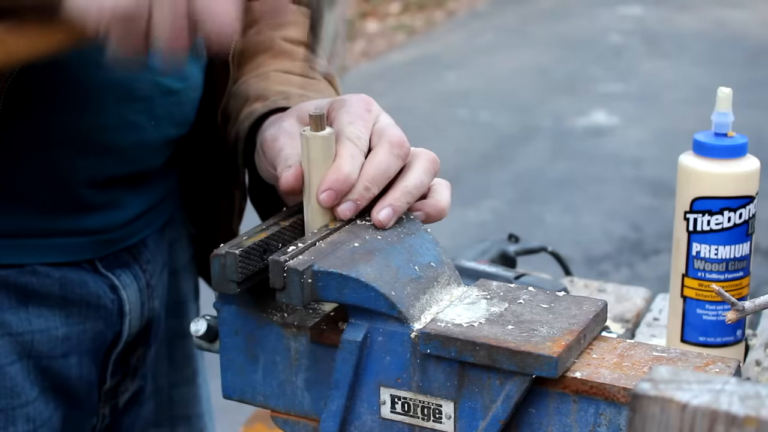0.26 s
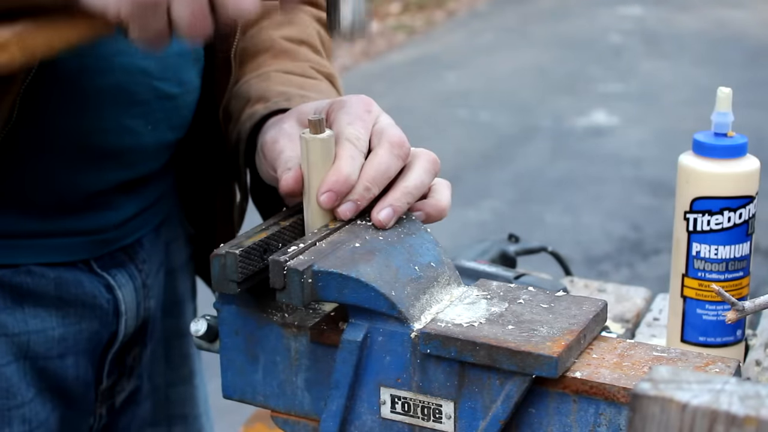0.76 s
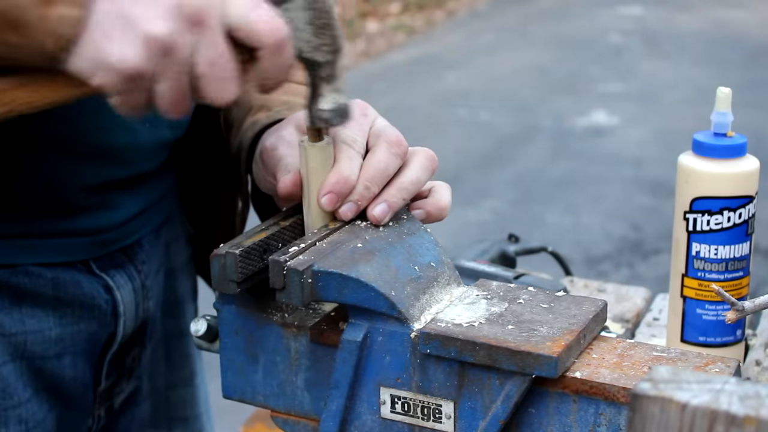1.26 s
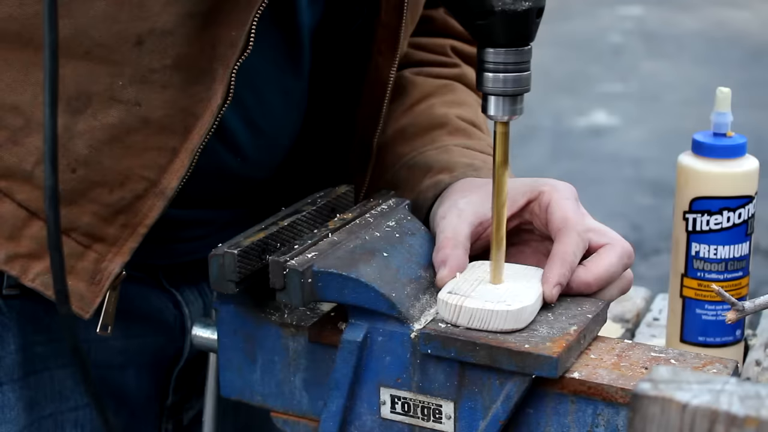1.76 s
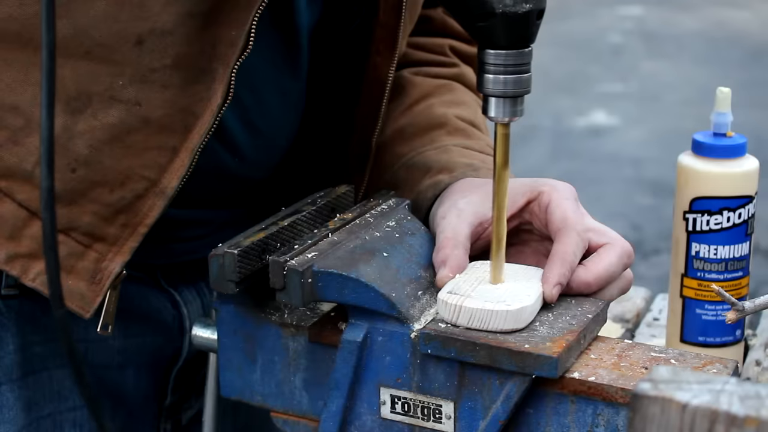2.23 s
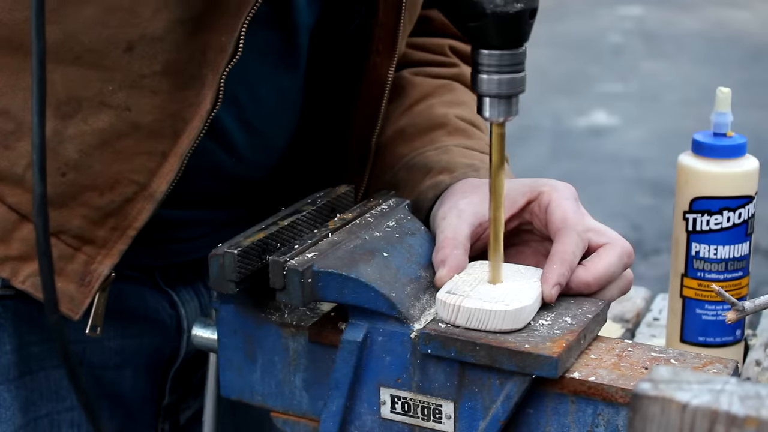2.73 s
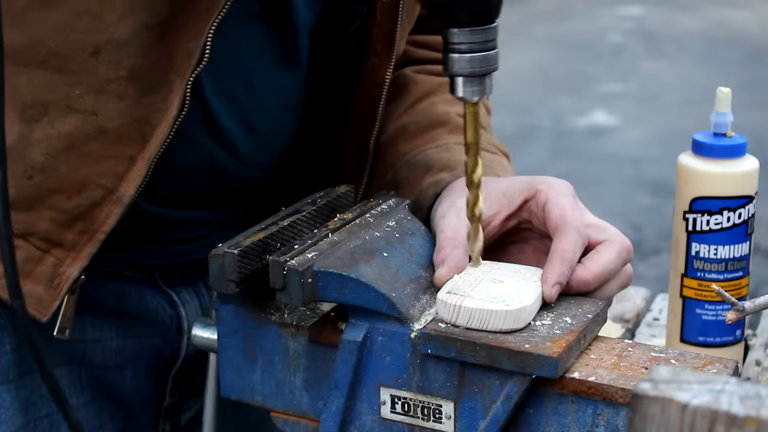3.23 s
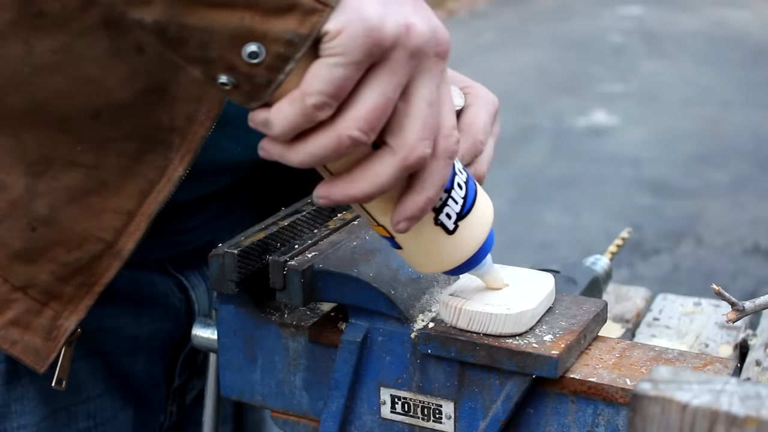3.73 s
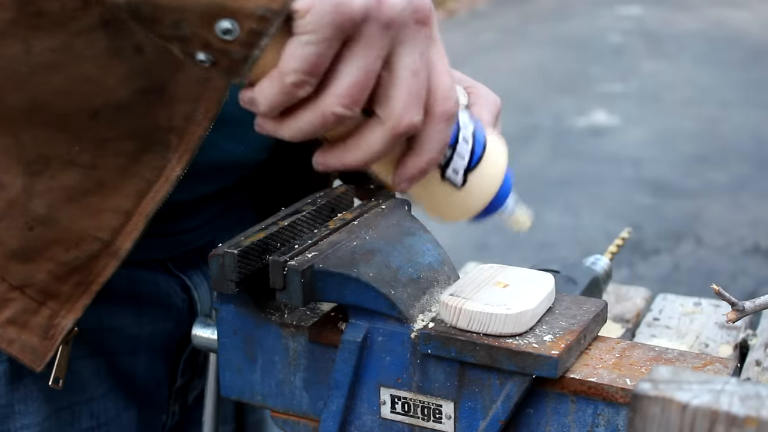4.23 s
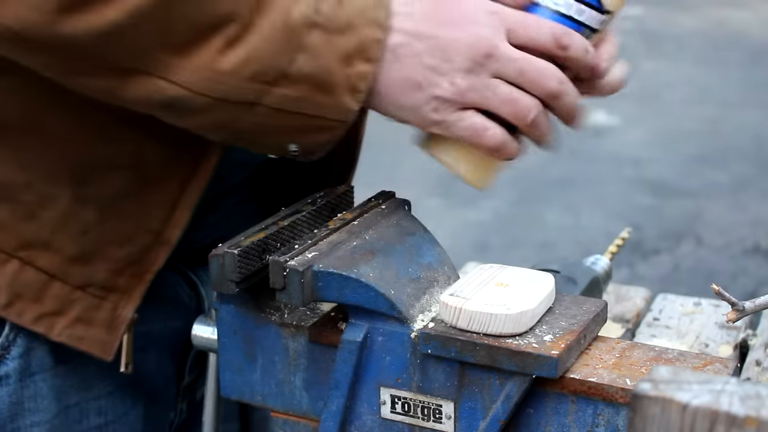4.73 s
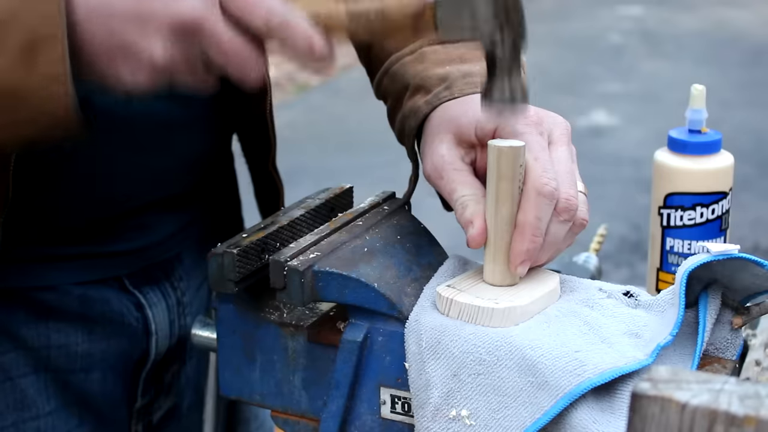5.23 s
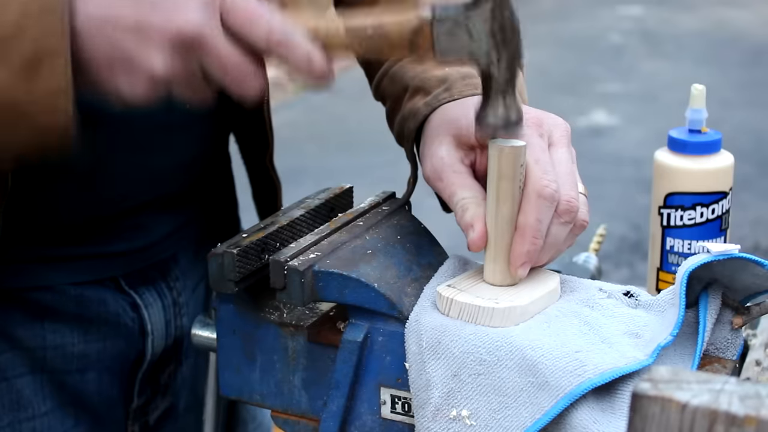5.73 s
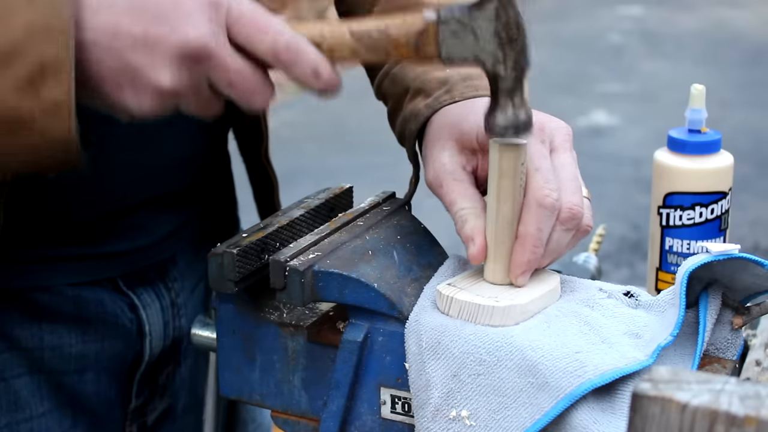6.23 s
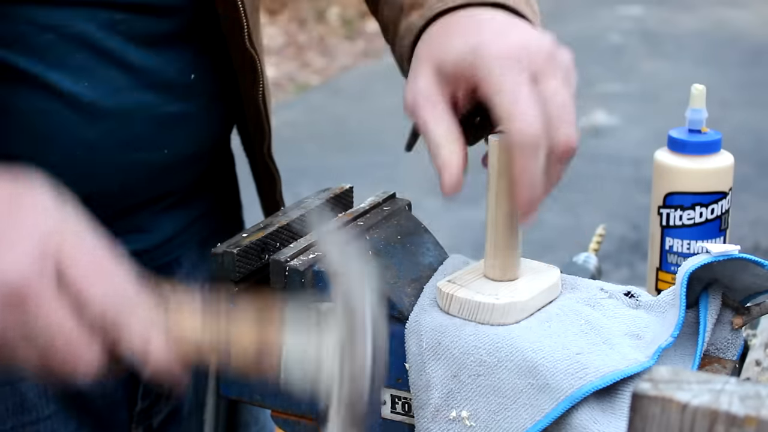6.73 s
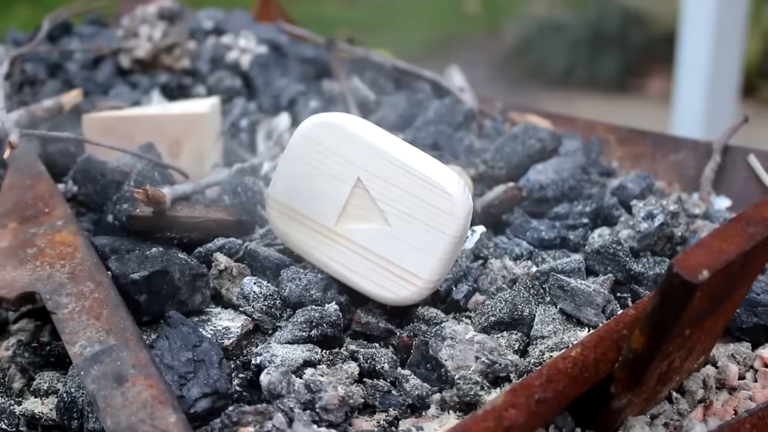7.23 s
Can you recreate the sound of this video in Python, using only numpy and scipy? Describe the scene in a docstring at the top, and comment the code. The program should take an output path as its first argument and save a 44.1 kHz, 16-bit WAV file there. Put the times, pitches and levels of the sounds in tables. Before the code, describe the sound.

A hammer strikes a wooden dowel in a steel vise six times, sharp and bright. An electric drill buzzes up, bores briefly and coasts to a stop with a small squeak. A sleeve rustles, then five deeper blows drive the dowel into a block, rattling the workbench. Finally a spray can hisses. Faint outdoor rumble and air lie underneath, and the blows overload the close mono microphone.

```python
"""Sharp hammer blows on a dowel in a steel vise, outdoors; loose things jump on the bench, a bird calls.
A drill, pulsed by the mains, spins up, bores and coasts to a stop; the bit squeaks out of the hole.
A sleeve rustles during gluing, then deeper blows drive the dowel into a block and ring the bench.
Last, a spray can hisses through its nozzle. Under it all: rumble, air, gusts and a passing drone.
The blows overload a close mono microphone, whose gain dips briefly each time."""
import sys
import numpy as np
from scipy import signal
from scipy.fft import rfft, irfft, next_fast_len
from scipy.io import wavfile
from scipy.ndimage import uniform_filter1d, map_coordinates

SR = 44100
rng = np.random.default_rng(int(sys.argv[2]) if len(sys.argv) > 2 else 0)


def output_pcm(signal):
    """Save a mono or channel-first signal as 16-bit PCM at the path in sys.argv[1].

    Samples are clipped to [-1, 1] before scaling.
    """
    pcm = np.clip(np.atleast_2d(signal).T, -1, 1) * 32767
    wavfile.write(sys.argv[1], SR, np.round(pcm).astype(np.int16))


N = 329427
T = np.arange(N) / SR
AGE_S = T[:SR]  # time since a contact

# blows in the vise: start_s, force_db, head_low_db, head_high_db
VISE_BLOWS = [(0.025, -0.5, 5, -3), (0.3483, -0.5, 1, 0.5), (0.659, -2, -4.5, -4.5), (0.9865, 0, 2, 1),
              (1.2857, -4, -7, 4.5), (1.5975, -3, -6.5, 0.5)]
# blows in the block: start_s, force_db, head_low_db, head_high_db, wood_db
BLOCK_BLOWS = [(5.2208, 0, -9, -5, -5), (5.4768, 1.5, -4, -6, -0.5), (5.728, -1.5, -4, -12.5, 2.5),
               (5.9857, 0.5, -5.5, 3, -4), (6.2275, -2, -10, -14, 2)]
# small contacts: start_s, level_db
TAPS = [(0.311, -25), (0.621, -24), (0.9419, -28), (1.2676, -22), (1.275, -25), (1.5766, -19), (4.455, -35),
        (4.702, -40.5), (6.2812, -19.5)]
KNOCKS = [(1.323, -23.5), (1.635, -21), (4.701, -31.5), (5.541, -18), (5.761, -15), (5.814, -18),
          (6.068, -23.5), (6.281, -20), (6.3153, -18), (6.9145, -25)]
# struck modes: pitch_hz, level_db, t60_s
VISE_MODES = [(124.4, -31.5, 0.91), (1123, -18, 0.094), (1370, -5, 0.023), (1752, -4, 0.045),
              (2210, -28.5, 0.14), (2400, -12, 0.097), (2593, -6.5, 0.041), (2905, 3, 0.014),
              (3256, -2, 0.031), (4360, -8, .025), (5150, -9, 0.017), (8040, -28.5, 0.1),
              (12400, -28, 0.049)]
HEAD_MODES = [(1593, -38.5, 0.37), (5638, -44, 0.89)]
DOWEL_MODES = [(1873, -15, 0.022), (2440, -11.5, 0.039), (3027, -1, 0.022), (4100, -5, 0.0096),
               (4930, -17.5, .015)]
BLOCK_MODES = [(140.2, -12.5, 0.2), (265.3, -19, 0.25), (367.7, -10, 0.17), (460, -4.5, 0.05),
               (600, -8, 0.19), (772, -25.5, 0.116), (864, -11.5, 0.059), (1065, -6, .14),
               (1330, -16.5, 0.18), (1506, -5, 0.056), (1790, -6, 0.056), (2320, -17.5, 0.17),
               (2910, -14, 0.089), (3380, -21.5, 0.18), (3600, -25, 0.12)]  # block and bench
# contact and clatter spectra: freq_hz, density_db
VISE_CRACK = [(60, -20.5), (300, -11.5), (1000, -19), (1800, 6), (3100, 5.5), (5000, -8.5), (9000, -10.5),
              (16000, -35.5)]
VISE_CLATTER = [(40, -21), (130, -1.5), (400, -2), (900, -6), (2500, -9), (4500, -5.5), (9000, -17),
                (16000, -26.5)]
KNOCK_CLATTER = [(60, -16.5), (250, 0.5), (600, 4.5), (1300, 1), (2000, -1), (3200, -16.5), (5000, -32.5),
                 (16000, -55.5)]
BLOCK_CRACK = [(50, -27), (150, -7.5), (600, -11), (1400, -1), (2600, -3), (5000, -17.5), (9000, -24.5),
               (16000, -33)]
BLOCK_CLATTER = [(40, -69), (140, -3), (500, -1), (1300, -2), (2500, -3), (4000, -7), (6000, -19),
                 (16000, -50)]
# clatter decay by band: freq_hz, t60_s
VISE_DECAY = [(130, 0.84), (450, 0.56), (1000, 0.15), (2500, 0.38), (6000, 0.056), (14000, .08)]
KNOCK_DECAY = [(200, 0.16), (600, 0.063), (1500, 0.027), (8000, 0.025)]
BLOCK_DECAY = [(130, 0.41), (500, 0.34), (1300, 0.21), (3500, 0.13), (10000, 0.091)]
# noise spectra: freq_hz, density_db
RUMBLE = [(25, -17), (70, -4.5), (125, 1), (185, -2.5), (330, -6), (510, -12.5), (800, -15), (1500, -34),
          (3000, -75)]
AIR = [(200, -4), (700, 0.5), (1300, 1.5), (2300, -1.5), (3300, 2), (4500, -9.5), (7000, -15.5),
       (15000, -27)]
MIC_HISS = [(1000, -15), (4000, -2.5), (9000, 1), (15500, 0)]
SLEEVE_NOISE = [(240, -17), (400, -0.5), (928, -1.5), (1610, 1), (1990, -2), (3360, 1.5), (4290, -10),
                (15500, -21.5)]
CUFF_NOISE = [(2000, -18.5), (5500, -5), (10000, -1), (15500, -3.5)]
GEAR_NOISE = [(40, -25), (150, -23), (330, -15.5), (800, -12.5), (1400, -5.5), (1850, 0), (2250, -4.5),
              (3300, 1), (4400, -8.5), (5800, -10.5), (7800, -8), (9500, -12.5), (12500, -17), (15500, -28)]
WIND_NOISE = [(35, 1.0), (75, -1.0), (160, -8), (600, -60)]
DRONE_NOISE = [(60, -25), (120, -3), (190, 0), (300, -9), (700, -31), (2000, -70)]
JET_NOISE = [(100, -17), (700, -11), (1400, -9), (2200, -2), (3100, -2.5), (3550, 1.5), (4000, -4.5),
             (5600, -4.5), (6150, 0.5), (6600, -3.5), (7300, 0.5), (9300, 0), (13000, 1.5), (15500, 0)]
# background of each job: start_s, rumble_db, air_db, hiss_db
BACKGROUNDS = [(0, -51, -50, -65.5), (1.738, -61, -56.5, -70.5), (3.61, -52, -61, -65),
               (5.141, -57, -50.5, -67), (6.71, -54.5, -56.5, -66)]
# swells: start_s, length_s, level_db
SLEEVE_STROKES = [(4.3, 0.42, -53), (4.64, 0.24, -51.5), (4.81, 0.33, -44.5)]
CUFF_STROKES = [(4.3, 0.4, -65.5), (4.68, 0.054, -52.5), (4.785, 0.06, -51.5)]
GUSTS = [(2.6, 0.67, -58.5), (3.4, 1.0, -53.5)]
DRONE_SWELLS = [(3.9, 1.4, -49.5)]
# glides: start_s, length_s, first_hz, last_hz, level_db
BIRD_CALLS = [(1.32, 0.15, 7550, 7200, -47.5)]
BIT_SQUEAKS = [(3.463, 0.025, 4560, 4370, -42), (3.49, 0.13, 3320, 3340, -58),
               (3.53, 0.083, 4340, 4300, -65)]
# noise-driven resonances: pitch_hz, width_hz, level_db
HOUSING_MODES = [(1927, 65, -12.5), (3073, 160, -10.5), (6780, 200, -7), (10900, 320, -13),
                 (14200, 400, -21)]
NOZZLE_MODES = [(2694, 165, -10.5), (8400, 240, -12.5)]
# drill housing responses: freq_hz, gain_db
STANDSTILL_TILT = [(2000, 11.0), (3100, 14.5), (6800, -10.5), (14000, -12)]
BRUSH_RESPONSE = [(1100, -17), (1950, 6.0), (2400, -7), (3000, 1), (4000, -12), (6000, -17)]
# hollow notes of the gripped can: pitch_hz, level_db
CAN_NOTES = [(85, -14), (281, -6.5)]

TRIGGER_ON_S, TRIGGER_OFF_S = 1.738, 2.582
MAINS_HZ, FIRST_PULSE_S = 60.05, 1.7432
START_RPS, TOP_RPS, STALL_RPS = 205, 254, 39.4
FAN_BLADES, ARMATURE_SLOTS, COMMUTATOR_BARS, GEAR_RATIO = 8, 12, 24, 13


def amp(db):
    """Decibels to gain."""
    return 10 ** (np.asarray(db) / 20)


def unit(x):
    """Scale to rms 1."""
    return x / np.sqrt(np.mean(x ** 2) + 1e-20)


def along(points, hz):
    """Read (freq_hz, value) points on a log axis."""
    freqs_hz, values = np.transpose(points)
    return np.interp(np.log(hz + 1), np.log(freqs_hz + 1), values)


def wobble(rate_hz):
    """Smooth random curve."""
    return map_coordinates(rng.standard_normal(int(N * rate_hz / SR) + 4), [T * rate_hz])


def filtered(x, response):
    """Apply a frequency response."""
    size = next_fast_len(len(x) + 8192)
    return irfft(rfft(x, size) * response(np.fft.rfftfreq(size, 1 / SR)), size)[:len(x)]


def noise(spectrum, samples=N):
    """Coloured noise, rms 1."""
    return unit(filtered(rng.standard_normal(samples), lambda hz: amp(along(spectrum, hz))))


def fuzzy_tone(hz, width_hz):
    """Narrow noise around a steady or moving pitch, rms 1."""
    phase = 2 * np.pi * np.cumsum(hz * np.ones(N)) / SR
    a, b = (filtered(rng.standard_normal(N), lambda f: 1 / (1 + (f / width_hz) ** 2)) for _ in range(2))
    return unit(a * np.cos(phase) + b * np.sin(phase))


def fade(t60_s):
    """Decay by 60 dB in t60_s."""
    return np.exp(-np.log(1000) * AGE_S / t60_s)


def ramp(start_s, length_s):
    """Linear rise, 0 to 1."""
    return np.clip((T - start_s) / length_s, 0, 1)


def held(start_s, length_s, attack_s, release_s):
    """Attack, hold, release."""
    return ramp(start_s, attack_s) * (1 - ramp(start_s + length_s - release_s, release_s))


def settling(start_s, tau_s):
    """1 until start_s, then exponential decay."""
    return np.exp(-np.maximum(T - start_s, 0) / tau_s)


def swells(rows):
    """One arch of gain per row."""
    return sum(amp(db) * np.sin(np.pi * ramp(start_s, length_s)) for start_s, length_s, db in rows)


def glides(rows, width_hz):
    """Thin sliding tones that swell and ebb."""
    out = np.zeros(N)
    for start_s, length_s, first_hz, last_hz, db in rows:
        pitch_hz = first_hz + (last_hz - first_hz) * ramp(start_s, length_s)
        out += swells([(start_s, length_s, db)]) * fuzzy_tone(pitch_hz, width_hz)
    return out


def ring(modes, scatter_db, detune):
    """Struck modes; each blow lands a little differently."""
    out = np.zeros(SR)
    for hz, db, t60_s in modes:
        gain = amp(db + scatter_db * rng.normal()) * rng.choice([-1, 1])
        pitch_hz = hz * (1 + detune * rng.normal())
        out += gain * fade(t60_s) * np.sin(2 * np.pi * pitch_hz * AGE_S)
    return out


def clatter(spectrum, decays):
    """Dense noisy ring; each band dies at its own rate."""
    hz, age_s, bands = signal.stft(noise(spectrum, SR), SR, nperseg=256)
    decay = np.exp(-np.log(1000) * age_s / along(decays, hz)[:, None])
    return signal.istft(bands * decay, SR, nperseg=256)[1][:SR]


def crack(spectrum, t60_s):
    """Brief burst of a hard contact."""
    envelope = fade(t60_s)
    burst = noise(spectrum, SR) * envelope
    return 0.5 * burst / np.sqrt(np.sum(burst ** 2) / np.sum(envelope ** 2))


def add(track, start_s, sound):
    """Mix a sound in at start_s."""
    part = track[round(start_s * SR):][:len(sound)]
    part += sound[:len(part)]


def background():
    """Distant rumble, soft air and microphone hiss; levels step from job to job."""
    starts_s, rumble_db, air_db, hiss_db = np.transpose(BACKGROUNDS)
    job = np.searchsorted(starts_s[1:], T)
    rumble = amp(rumble_db[job] + 1.3 * wobble(12)) * noise(RUMBLE)
    air = amp(air_db[job] + 1.6 * wobble(7.1)) * noise(AIR)
    return rumble + air + amp(hiss_db[job]) * noise(MIC_HISS)


def vise_hammering():
    """Hard, bright blows: the clamped dowel rings briefly, the bench rumbles on until the scene changes to the
    drill."""
    out = np.zeros(N)
    for start_s, force_db, *_ in VISE_BLOWS:
        contact = amp(16) * crack(VISE_CRACK, t60_s=0.0033)
        dowel = amp(-10) * ring(VISE_MODES, scatter_db=4.5, detune=0.014)
        bench = amp(-25) * clatter(VISE_CLATTER, VISE_DECAY)
        add(out, start_s, amp(force_db) * (contact + dowel + bench))
    return (out + hammer_head(VISE_BLOWS)) * (T < TRIGGER_ON_S)


def hammer_head(blows, swing_s=0.25, swing_db=8):
    """Steel rings until the next contact, swelling as the swing turns it towards the microphone."""
    out = np.zeros(N)
    swing = amp(swing_db * np.sin(np.pi * np.minimum(AGE_S / swing_s, 1)))
    for start_s, _, low_db, high_db, *_ in blows:
        out *= T < start_s
        modes = [(hz, db + struck_db, t60_s)
                 for (hz, db, t60_s), struck_db in zip(HEAD_MODES, (low_db, high_db))]
        add(out, start_s, swing * ring(modes, scatter_db=1, detune=0))
    return out


def clothing(lead_s=0.2, downswing_s=0.14):
    """Canvas sleeve and cuff rustle on each downswing and during gluing."""
    swings = swells([(blow_s - lead_s, downswing_s, 0) for blow_s, *_ in VISE_BLOWS + BLOCK_BLOWS])
    sleeve_gain = (swells(SLEEVE_STROKES) + amp(-52.5) * swings) * amp(1.3 * wobble(250))
    cuff_gain = swells(CUFF_STROKES) + amp(-64.5) * swings
    return sleeve_gain * noise(SLEEVE_NOISE) + cuff_gain * noise(CUFF_NOISE)


def taps():
    """Light, dry contacts of the dowel and handled things."""
    out = np.zeros(N)
    for start_s, db in TAPS:
        wood = amp(1.5) * ring(DOWEL_MODES, scatter_db=3.5, detune=0.026)
        contact = amp(-2) * crack(VISE_CRACK, t60_s=0.018)
        add(out, start_s, amp(db) * (wood + contact))
    return out


def bird():
    """One thin, falling call."""
    return glides(BIRD_CALLS, width_hz=170)


def knocks():
    """Loose things jump on the bench and wake its modes; the last row is a click of the spray can."""
    out = np.zeros(N)
    for start_s, db in KNOCKS:
        rattle = amp(-3) * clatter(KNOCK_CLATTER, KNOCK_DECAY)
        bench = amp(-11) * ring(BLOCK_MODES, scatter_db=4, detune=0.0031)
        add(out, start_s, amp(db) * (rattle + bench))
    return out


def motor_rps(spin_up_s=0.315, drag_s=2.0, friction_rps_per_s=205):
    """Spin-up under power, then coasting against air drag and dry friction."""
    powered_s = np.clip(T, TRIGGER_ON_S, TRIGGER_OFF_S) - TRIGGER_ON_S
    powered_rps = TOP_RPS - (TOP_RPS - START_RPS) * np.exp(-powered_s / spin_up_s)
    drag = settling(TRIGGER_OFF_S, drag_s)
    speed_rps = powered_rps * drag - friction_rps_per_s * drag_s * (1 - drag)
    return np.maximum(speed_rps, 0) * (T > TRIGGER_ON_S)


def armature(angle_rad):
    """Sings on one current pulse per mains cycle; inrush makes the first ones stronger and wider."""
    off_pulse_s = (((T - FIRST_PULSE_S) * MAINS_HZ + 0.5) % 1 - 0.5) / MAINS_HZ
    inrush = settling(TRIGGER_ON_S, tau_s=0.08)
    half_width_s = 0.0015 + 0.0011 * inrush
    pulses = np.exp(-(off_pulse_s / half_width_s) ** 2)
    current = amp(-15 + 2 * inrush) * (T > TRIGGER_ON_S) * (T < TRIGGER_OFF_S)
    return current * pulses * amp(0.51 * wobble(59.9)) * np.sin(ARMATURE_SLOTS * angle_rad)


def gears(angle_rad, pace):
    """Uneven grinding; slowing, slack gears chatter once a turn and favour the low housing modes."""
    chatter_db = 2.9 * (1 - pace) * np.sin(angle_rad)
    uneven = unit(amp(2.2 * wobble(450) + 0.41 * pace * wobble(60) + chatter_db))
    housing = sum(amp(db + 0.5 + (1 - pace) * along(STANDSTILL_TILT, hz)) * fuzzy_tone(hz, width_hz)
                  for hz, width_hz, db in HOUSING_MODES)
    return uneven * (amp(2.5) * noise(GEAR_NOISE) + housing)


def fan(angle_rad, pace):
    """Blade tone, growing with speed cubed."""
    gain = amp(-3.5 + 1.7 * wobble(30.16)) * pace ** 3
    return gain * np.sin(FAN_BLADES * angle_rad + 0.21 * wobble(24.9))


def brushes(speed_rps):
    """Commutator whine, gliding through the housing's resonances."""
    pitch_hz = COMMUTATOR_BARS * speed_rps
    return amp(along(BRUSH_RESPONSE, pitch_hz)) * fuzzy_tone(pitch_hz, width_hz=130)


def drill(db_per_decade=14):
    """Armature buzz plus running noise, which swells with speed, the bit's bite and each chuck turn."""
    speed_rps = motor_rps()
    pace = speed_rps / speed_rps.max()
    angle_rad = 2 * np.pi * np.cumsum(speed_rps) / SR
    speed_db = db_per_decade * np.log10(speed_rps / TOP_RPS + 1e-9)
    bite_db = 4.5 * held(start_s=1.824, length_s=0.913, attack_s=0.22, release_s=0.14)
    chuck_db = 1.6 * np.sin(angle_rad / GEAR_RATIO) * pace
    stall_fade = 1 - np.exp(-(speed_rps / STALL_RPS) ** 2)
    gain = amp(-34.5 + speed_db + bite_db + chuck_db) * stall_fade
    running = gears(angle_rad, pace) + fan(angle_rad, pace) + brushes(speed_rps)
    return armature(angle_rad) + gain * running


def breeze():
    """Gusts buffet the microphone."""
    return swells(GUSTS) * amp(2.7 * wobble(8.6)) * noise(WIND_NOISE)


def bit_squeaks():
    """The bit squeaks on its way out of the hole."""
    return glides(BIT_SQUEAKS, width_hz=75)


def drone():
    """A far, low drone swells and passes."""
    return swells(DRONE_SWELLS) * noise(DRONE_NOISE)


def block_hammering():
    """Deeper blows pass through the block into the bench."""
    out = np.zeros(N)
    for start_s, force_db, *_, wood_db in BLOCK_BLOWS:
        contact = amp(11) * crack(BLOCK_CRACK, t60_s=0.0049)
        wood = amp(wood_db - 13) * ring(BLOCK_MODES, scatter_db=2, detune=0.0009)
        bench = amp(-19) * clatter(BLOCK_CLATTER, BLOCK_DECAY)
        add(out, start_s, amp(force_db) * (contact + wood + bench))
    return out + hammer_head(BLOCK_BLOWS)


def can_grip(start_s=6.847):
    """A hand bumps and scuffs the hollow can."""
    hollow = sum(amp(db) * np.sqrt(2) * np.sin(2 * np.pi * hz * T + 0.5 * wobble(43))
                 for hz, db in CAN_NOTES)
    scuff = amp(-10.5) * fuzzy_tone(3060, width_hz=540)
    bump_db = 11 * settling(start_s, tau_s=0.016)
    grip = held(start_s, length_s=0.125, attack_s=0.006, release_s=0.035)
    return grip * amp(-31 + bump_db) * (hollow + scuff)


def turbulence(x, depth_db):
    """Patches of neighbouring bands flutter independently; rms 1."""
    bands = signal.stft(x, nperseg=512)[2]
    patches = uniform_filter1d(rng.standard_normal(bands.shape), size=6, axis=0)
    patches = uniform_filter1d(patches, size=7, axis=1)
    return unit(signal.istft(bands * amp(depth_db * unit(patches)), nperseg=512)[1][:N])


def spray(open_s=6.92, crest_s=7.07, sweep_s=0.262):
    """The jet spurts, then settles; two nozzle resonances rise and fall as the can sweeps."""
    pitch_ratio = 1 + 0.036 * np.cos(2 * np.pi * (T - crest_s) / sweep_s)
    nozzle = sum(amp(db) * fuzzy_tone(hz * pitch_ratio, width_hz) for hz, width_hz, db in NOZZLE_MODES)
    jet = amp(0.5) * turbulence(noise(JET_NOISE), depth_db=1.5)
    valve = ramp(open_s, length_s=0.033) ** 2
    spurt_db = 17 * settling(open_s, tau_s=0.038)
    return valve * amp(-25 + spurt_db + 0.59 * wobble(120)) * (jet + nozzle)


def scene():
    """All sources at one microphone; both channels alike."""
    mono = (background() + vise_hammering() + clothing() + taps() + bird() + knocks() + drill()
            + breeze() + bit_squeaks() + drone() + block_hammering() + can_grip() + spray())
    return np.array([mono, mono])


def record(dry, ceiling=0.65, duck_db=5, hold_s=0.092, glide_s=0.016, cutoff_hz=15850):
    """Blows clip the input; the gain control dips after each overload; the top treble is cut."""
    mono = dry.mean(axis=0)
    last_overload_s = np.maximum.accumulate(np.where(np.abs(mono) > ceiling, T, -1))
    holding = 1.0 * (T - last_overload_s < hold_s)
    step = 1 / (glide_s * SR)
    duck = signal.lfilter([step], [1, step - 1], holding)
    ducked = np.clip(mono, -ceiling, ceiling) * amp(-duck_db * duck)
    out = filtered(ducked, lambda hz: hz < cutoff_hz)
    return np.array([out, out])


dry = scene()
out = record(dry)
output_pcm(out)
```